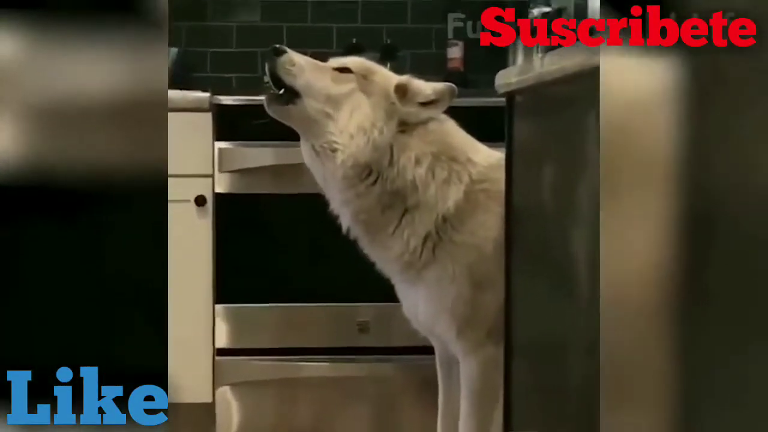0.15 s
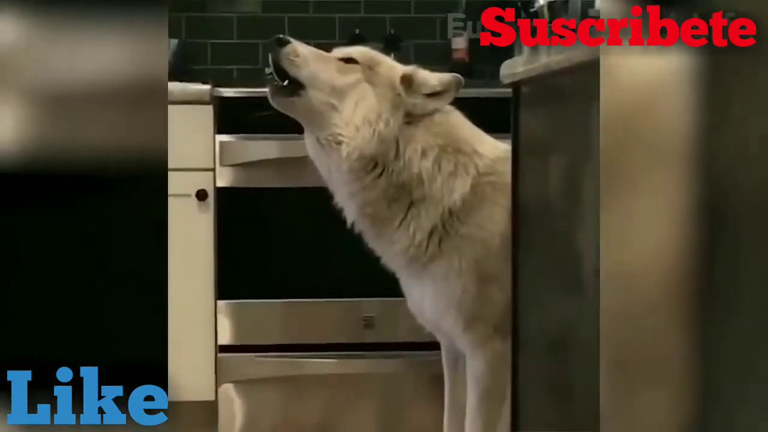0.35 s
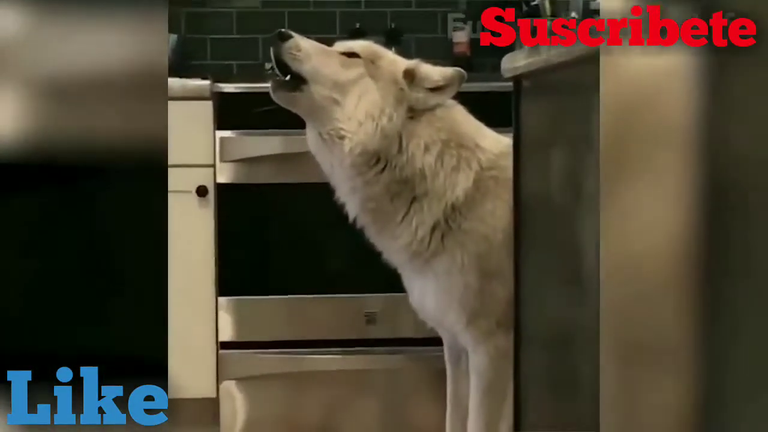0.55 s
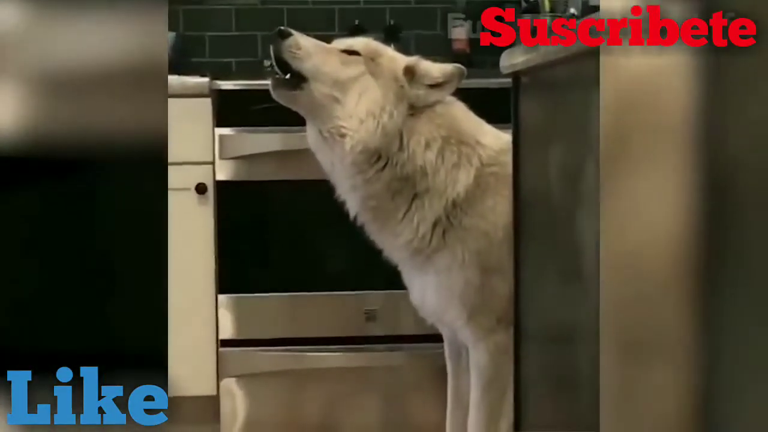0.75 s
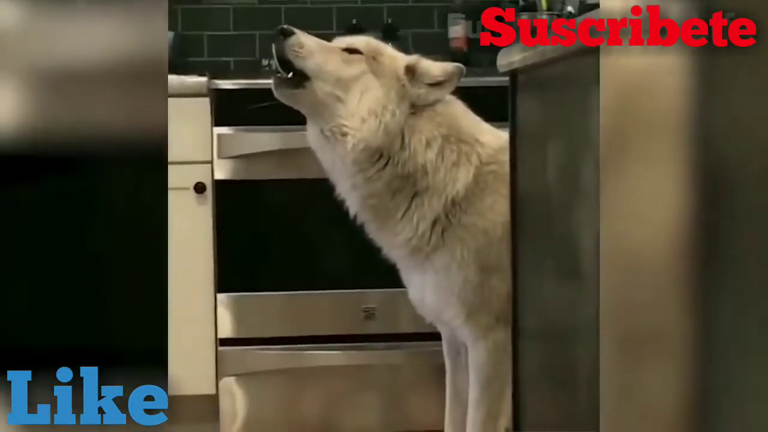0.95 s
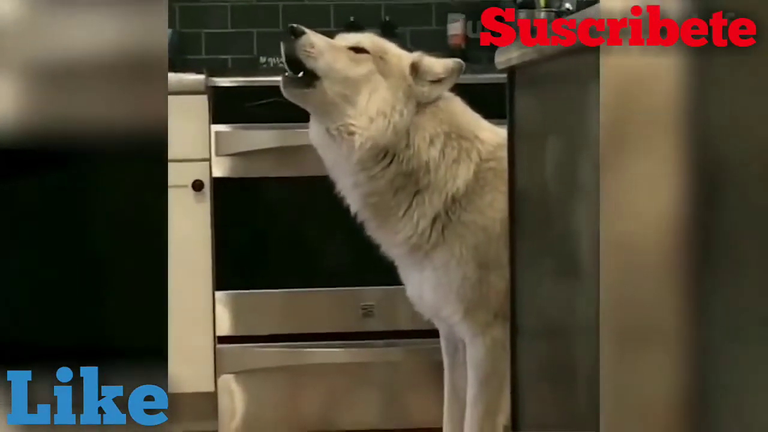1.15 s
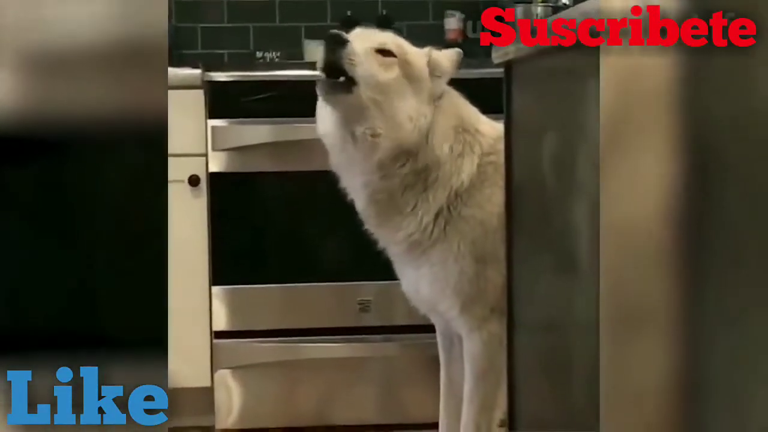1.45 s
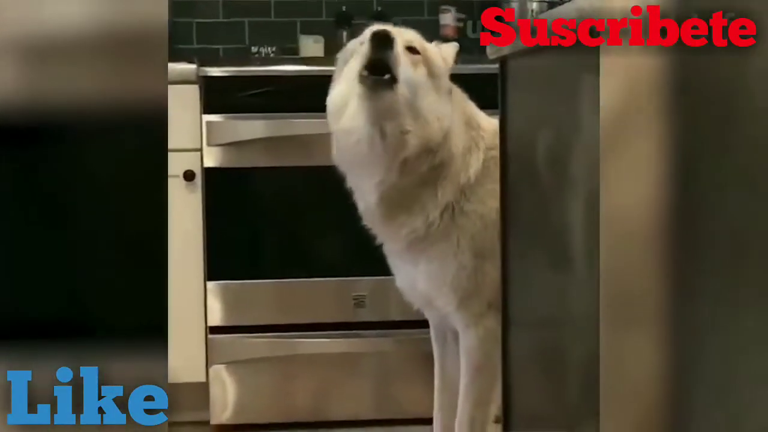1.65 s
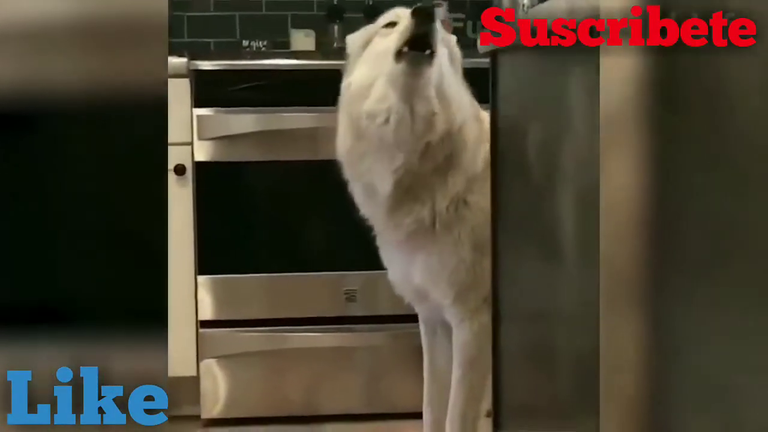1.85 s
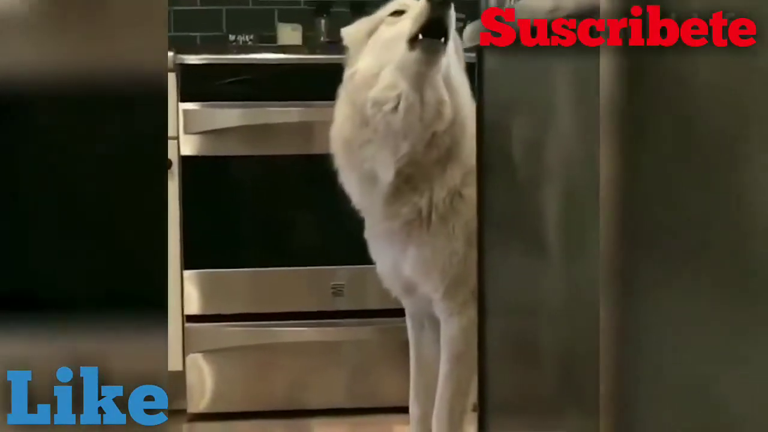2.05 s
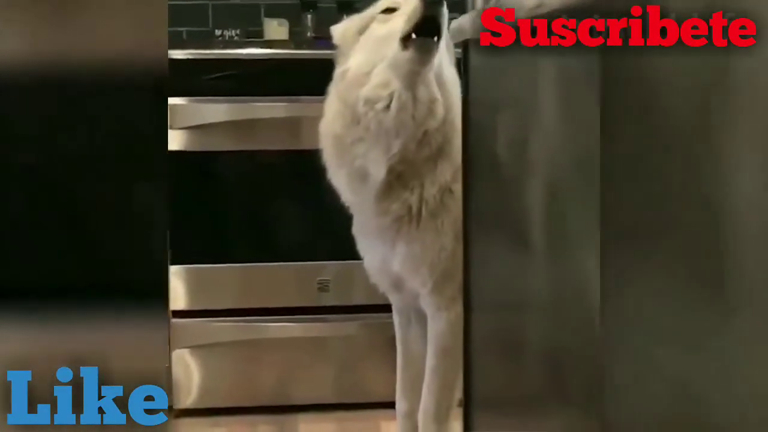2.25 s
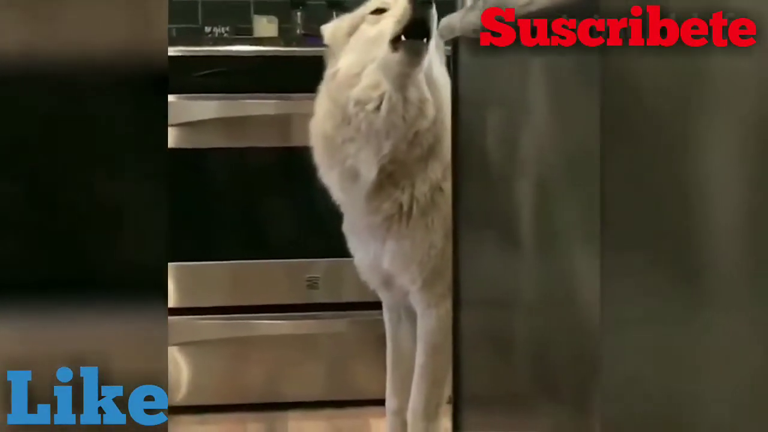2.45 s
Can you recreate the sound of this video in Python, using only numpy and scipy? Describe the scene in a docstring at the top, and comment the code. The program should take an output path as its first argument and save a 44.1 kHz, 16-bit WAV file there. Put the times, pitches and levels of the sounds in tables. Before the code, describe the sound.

Single unbroken wolf-like dog howl indoors, already sounding at the start and lasting throughout; it sags, wavers and climbs back, with light breath, short hard-room reverberation, quiet appliance hum and slightly dulled top end.

```python
"""Dog howling in a kitchen

Indoors, a tiled kitchen: a large dog holds one long, clean howl; the pitch sags and recovers, and late on
the third throat resonance rises briefly. Four strong low partials swell and dip; faint high ones are sines
shaped by narrow throat resonances, with filtered noise for breath and hiss. The walls add a dense tail and
one ringing mode. Behind lie quiet room noise and a wavering appliance hum; the recorder cuts the top."""
import sys
import numpy as np
from scipy import signal
from scipy.fft import rfft, irfft, next_fast_len
from scipy.io import wavfile
from scipy.ndimage import uniform_filter1d

SR = 44100
rng = np.random.default_rng(int(sys.argv[2]) if len(sys.argv) > 2 else 0)


def persist_wave(psi):
    """Save psi, clipped to +-1, as 16-bit WAV."""
    counts = np.round(np.clip(psi, -1, 1) * 32767).astype(np.int16)
    wavfile.write(sys.argv[1], SR, np.atleast_2d(counts).T)


N = 114660
TIME_S = np.arange(N) / SR
TOP_HZ = 11900  # upper limit of the recorder
UNSTEADY = 0.44  # wavering and grain grow by this share while the pitch is down
CLEARS_DB = -2  # change of flutter and low breath while the pitch is down


# The held howl: start_s, pitch_hz, then level_db (rms, before the room) of partials 1, 2, 3, 4
HOWL_COURSE = [(0.03, 332.9, -22, -29.5, -35.5, -36.5), (0.09, 334.5, -20.5, -31, -29.5, -35.5),
               (0.19, 333.9, -20, -32, -34, -34.5), (0.37, 335.2, -20.5, -40, -31.5, -35),
               (0.4, 336.3, -20, -44, -30, -35), (0.45, 337.5, -19.5, -33, -29, -32.5),
               (0.54, 338.8, -18, -29.5, -38.5, -34), (0.6, 338.5, -18, -28.5, -34, -31.5),
               (0.82, 339.4, -18, -31, -40, -34.5), (0.93, 341.7, -17.5, -35, -48, -43),
               (0.98, 340.8, -17.5, -33, -41, -43.5), (1.07, 341.5, -18, -34.5, -36, -40),
               (1.12, 340.2, -18, -35.5, -47, -40.5), (1.15, 340.6, -18, -35, -39, -40),
               (1.23, 339, -17, -32.5, -28.5, -35.5), (1.28, 339.2, -17, -33, -28.5, -40),
               (1.34, 336.2, -18, -30.5, -28.5, -32), (1.4, 335.2, -19, -34, -25, -32),
               (1.42, 334.2, -20, -41.5, -28, -34), (1.46, 330.8, -21.5, -32.5, -37, -31.5),
               (1.49, 330.7, -20, -28, -36.5, -41.5), (1.55, 325.6, -20.5, -32.5, -36, -36),
               (1.59, 324, -20.5, -32, -49.5, -36.5), (1.62, 325.1, -17.5, -31, -40.5, -37.5),
               (1.65, 318.5, -18.5, -31.5, -47, -45.5), (1.7, 318.5, -23, -33.5, -33.5, -38.5),
               (1.74, 321.5, -23.5, -34.5, -41.5, -43), (1.8, 322, -19, -42, -42, -36),
               (1.85, 321.4, -17, -37.5, -33.5, -33), (1.89, 319.5, -18, -41, -35.5, -32),
               (1.93, 323.8, -17.5, -47.5, -34.5, -31), (1.97, 323, -16, -43.5, -32.5, -29),
               (1.99, 324.6, -16, -44.5, -36.5, -29), (2.02, 331.4, -16.5, -31.5, -28, -28),
               (2.07, 334.7, -26.5, -30.5, -27, -28.5), (2.09, 334.5, -22, -28.5, -22.5, -28.5),
               (2.22, 337.5, -16.5, -25.5, -27, -30.5), (2.25, 339, -14.5, -23.5, -37.5, -35),
               (2.33, 338.3, -15, -24, -42, -34), (2.37, 340.1, -15.5, -23.5, -29.5, -42.5),
               (2.4, 340.2, -16, -23.5, -28.5, -53.5), (2.45, 340.2, -17, -25, -35.5, -45.5),
               (2.5, 340.4, -17.5, -25, -35, -50.5), (2.57, 340.8, -18, -24.5, -34.5, -48)]
SAG_BELOW_HZ, SAG_SPAN_HZ = 334, 5.1  # the sag begins below this pitch and is full one span lower


def howl_course():
    """Pitch, four partial levels, and how far the pitch has sagged (0 to 1)."""
    pitch, *levels = course(HOWL_COURSE)
    pitch = uniform_filter1d(pitch, SR // 20)
    sag = np.clip((SAG_BELOW_HZ - pitch) / SAG_SPAN_HZ, 0, 1)
    return pitch, levels, sag


# Strength of the throat and breath: start_s, level_db of the first six main resonances listed, breath_db
THROAT_COURSE = [(0.03, -58.5, -68, -62.5, -62, -82.5, -75, -57.5),
                 (0.07, -58, -73, -62.5, -64.5, -76, -73, -60.5),
                 (0.12, -59, -64.5, -59.5, -61.5, -80.5, -77, -61),
                 (0.19, -66, -69, -63, -63.5, -66, -83, -62),
                 (0.23, -101, -63.5, -63, -66.5, -66.5, -74.5, -60.5),
                 (0.3, -67, -70, -62, -65.5, -63.5, -79, -61),
                 (0.41, -59, -78.5, -71, -61.5, -64, -84, -59.5),
                 (0.46, -64, -64, -68, -64.5, -63, -79, -62),
                 (0.56, -63.5, -70, -72.5, -58.5, -69, -81.5, -57),
                 (0.61, -100, -70.5, -74.5, -59, -63, -79, -58),
                 (0.8, -107, -65, -76.5, -57, -76, -77, -64),
                 (0.84, -66, -61.5, -72, -55.5, -63.5, -83, -59.5),
                 (0.99, -65, -60.5, -73, -61.5, -69.5, -72.5, -61),
                 (1.12, -65.5, -65, -76.5, -64.5, -61.5, -76.5, -61.5),
                 (1.27, -74, -60, -66, -59.5, -56.5, -68, -58.5),
                 (1.39, -86, -78, -64.5, -62.5, -71, -75.5, -59),
                 (1.55, -61.5, -59, -75.5, -80.5, -74, -78.5, -63),
                 (1.59, -58.5, -71.5, -80, -80, -69, -74.5, -68.5),
                 (1.66, -63, -64, -78.5, -79.5, -62.5, -79, -63),
                 (1.75, -54.5, -84, -70.5, -88.5, -64.5, -73.5, -66),
                 (1.83, -56.5, -61, -65, -66, -75, -67, -56.5),
                 (1.9, -58.5, -54.5, -63.5, -63.5, -60.5, -69.5, -61.5),
                 (1.95, -55.5, -56, -59, -59, -71.5, -65.5, -72.5),
                 (2.0, -55.5, -53, -58, -59, -66, -76, -52.5),
                 (2.05, -82, -52, -55.5, -53.5, -66, -61, -63.5),
                 (2.14, -83, -54.5, -57.5, -46.5, -59, -63, -54.5),
                 (2.3, -52, -51.5, -55, -53, -55.5, -61, -57.5),
                 (2.46, -56, -54.5, -52, -54, -65.5, -71, -57),
                 (2.57, -55, -51.5, -54.5, -57, -67, -65, -59)]
WOBBLE, WOBBLE_PER_S = 0.00036, 75  # rms share of the pitch while it is up; bandwidth in Hz
STRAIN = 0.5  # the wobble grows by this share while the pitch is down
SHIMMER_DB, SHIMMER_HZ = -40.5, 65  # depth while the pitch is up; width of the skirt round each partial


def dog(pitch, levels, sag):
    """Harmonics on one wobbling pitch; flutter of the folds modulates them all, breath and hiss add to them."""
    *ring, breath_db = course(THROAT_COURSE)
    wobble = WOBBLE * (1 + STRAIN * sag) * narrow(0, WOBBLE_PER_S)
    phase = 2 * np.pi * np.cumsum(pitch * (1 + wobble)) / SR
    strengths, rise = throat_strengths(ring), third_rise()
    voice = low_partials(phase, levels, sag)
    voice = voice + treble_partials(pitch, phase, strengths, rise, sag)
    voice = voice + half_partials(pitch, phase, strengths, rise)
    flutter = 1 + undb(SHIMMER_DB + CLEARS_DB * sag) * narrow(0, SHIMMER_HZ)
    return np.sqrt(2) * voice * flutter + low_breath(breath_db, sag) + throat_hiss(breath_db)


# Moments when a partial's standing wave passes a node: start_s (centre), partial_number, width_s
STANDING_NODES = [(.40, 2, .02), (1.115, 3, 0.012), (1.425, 2, 0.011), (1.992, 3, 0.01), (2.071, 1, 0.012),
                  (2.33, 3, 0.017)]
WAVER_DB, WAVER_PER_S = 0.1414, 65  # rms per partial number while the pitch is up; bandwidth in Hz


def low_partials(phase, levels, sag):
    """Four strong sines waver alone, higher ones more; each cancels and flips sign at its nodes."""
    sizes = []
    for k, level_db in enumerate(levels, 1):
        waver_db = WAVER_DB * k * (1 + UNSTEADY * sag) * narrow(0, WAVER_PER_S)
        sizes.append(undb(level_db + waver_db))
    for centre_s, k, width_s in STANDING_NODES:
        sizes[int(k) - 1] *= np.tanh((TIME_S - centre_s) / width_s)
    return sum(size * np.sin(k * phase + rng.uniform(0, 2 * np.pi)) for k, size in enumerate(sizes, 1))


TOP_PARTIAL = 34
FADE_DB, FADE_PER_S = 1.5, 13  # rms of each partial's own fading; bandwidth in Hz
# quick flicker while the pitch is up: dB per partial number, levelling off; bandwidth in Hz
GRAIN_DB, GRAIN_PER_S = 0.14, 38
# share of a partial that turns to breath while the pitch is down; lowest such partial; width
BREATHY, BREATHY_FROM, BREATHY_HZ = 0.25, 13, 70


def treble_partials(pitch, phase, strengths, rise, sag):
    """Faint sines weighted by the throat; each fades and flickers alone, the upper ones blur in the sag."""
    high = 0
    for k in range(5, TOP_PARTIAL + 1):
        tone = throat(k * pitch, strengths, rise) * np.sin(k * phase + rng.uniform(0, 2 * np.pi))
        if k >= BREATHY_FROM:
            tone = tone * (1 + BREATHY * sag * (narrow(0, BREATHY_HZ) - 1))
        grain_db = 2.7 * np.tanh(GRAIN_DB * k * (1 + UNSTEADY * sag) / 3.0)
        high = high + tone * undb(FADE_DB * narrow(0, FADE_PER_S) + grain_db * narrow(0, GRAIN_PER_S))
    return high


BREAK_S, BREAK_WIDTH_S, BREAK_DB = 1.995, 0.023, -1  # centre, width, level against the throat


def half_partials(pitch, phase, strengths, rise):
    """The voice roughens briefly on its way back up: partials 10.5 to 12.5 sound in the throat."""
    halves = sum(throat(k * pitch, strengths, rise) * np.sin(k * phase) for k in (10.5, 11.5, 12.5))
    return undb(BREAK_DB) * rough_patch() * halves


def rough_patch():
    """Bell in time round the break in the voice."""
    return np.exp(-((TIME_S - BREAK_S) / BREAK_WIDTH_S) ** 2)


# Two further throat resonances, their own course: start_s, level_db of the first, level_db of the second
SIDE_COURSE = [(0.03, -82.5, -77), (1.15, -72, -76.5), (2.03, -77.5, -88.5), (2.25, -54.5, -71),
               (2.57, -72.5, -77)]


def throat_strengths(ring):
    """Gain of every resonance in time; the last three main ones follow the sixth."""
    main = [undb(row[2] + ring[min(j, 5)]) for j, row in enumerate(RESONANCES)]
    return main + list(undb(course(SIDE_COURSE)))


THIRD_RISE_HZ, RISE_START_S, RISE_END_S = 220, 2.1, 2.21


def third_rise():
    """Smoothed 0-to-1 gate for the brief rise of the third throat resonance."""
    return uniform_filter1d(1. * (TIME_S > RISE_START_S) * (TIME_S < RISE_END_S), SR // 20)


# Main throat resonances: centre_hz, width_hz, level_db (against the throat course)
RESONANCES = [(1602, 330, 2.5), (1970, 260, 2), (2450, 560, -3), (3769, 350, 2), (4735, 570, -1),
              (5709, 160, 4.5), (3200, 350, -8), (9150, 520, -12.5), (10900, 550, -19)]
# The two further resonances: centre_hz, width_hz
SIDE_RESONANCES = [(4400, 240), (6550, 750)]
# Side pockets of the throat that swallow bands: centre_hz, width_hz
SIDE_POCKETS = [(4150, 230), (5300, 220), (6230, 160), (7300, 400)]


def throat(hz, strengths, rise):
    """Gain at a frequency: steep resonances side by side, times a notch for each pocket."""
    gain = 0
    for j, (row, strength) in enumerate(zip(RESONANCES + SIDE_RESONANCES, strengths)):
        centre_hz = row[0] + (j == 2) * THIRD_RISE_HZ * rise
        gain = gain + strength / (1 + (2 * (hz - centre_hz) / row[1]) ** 2) ** 2
    for centre_hz, width_hz in SIDE_POCKETS:
        gain = gain * (1 - 1.2 / (1 + (2 * (hz - centre_hz) / width_hz) ** 2))  # negative near the centre
    return gain


# Colour of the low breath: frequency_hz, level_db
BREATH_COLOUR = [(150, -34), (300, -4.5), (430, -2), (540, -9.5), (750, -12), (1100, -11.5), (1450, -16),
                 (1700, -45)]
BREATH_DB = 5  # against the breath course, while the pitch is up


def low_breath(breath_db, sag):
    """Low coloured noise follows the breath course and thins out in the sag."""
    level_db = uniform_filter1d(breath_db, SR // 20) + BREATH_DB + CLEARS_DB * sag
    return undb(level_db) * coloured(BREATH_COLOUR)


# Colour of the hiss through the throat: frequency_hz, level_db
HISS_COLOUR = [(1400, -27.5), (1800, -16.5), (2500, -2.5), (3150, -21.5), (3750, -1.5), (4150, -27),
               (4700, -4.5), (5300, -24.5), (5800, -1.5), (6230, -21), (6650, -8.5), (7250, -24.5),
               (9000, -15.5), (10200, -26.5), (11000, -22), (11800, -24)]
HISS_DB = -9  # against the breath course


def throat_hiss(breath_db):
    """Steadier noise through the throat follows the breath course slowly, its bands flickering."""
    return undb(uniform_filter1d(breath_db, SR // 2) + HISS_DB) * patchy(coloured(HISS_COLOUR))


HISS_FLICKER_DB, HISS_FLICKER_PER_S = 3.5, 6.1  # rms of each band's flicker; bandwidth in Hz


def patchy(x, count=20):
    """Cut a noise into equal bands up to the top limit, each swelling and fading alone."""
    spectrum = rfft(x)
    band = np.arange(len(spectrum)) * SR * count // (N * TOP_HZ)
    total = 0
    for j in range(count):
        flicker = undb(HISS_FLICKER_DB * narrow(0, HISS_FLICKER_PER_S))
        total = total + irfft(spectrum * (band == j), N) * flicker
    return total


UNDER_HZ, UNDER_WIDTH_HZ = 152, 5.5  # centre; rms wander
UNDER_DB, UNDER_BREAK_DB = -61.5, 5  # peak level in the full sag; rise at the break


def undertone(sag):
    """A low wandering sine sounds while the pitch is down, stronger round the break."""
    phase = 2 * np.pi * np.cumsum(UNDER_HZ + UNDER_WIDTH_HZ * narrow(0, 15.0)) / SR
    return undb(UNDER_DB + UNDER_BREAK_DB * rough_patch()) * sag * np.sin(phase)


KITCHEN_T60_S, KITCHEN_DB = 0.49, -25
ROOM_MODE_HZ, ROOM_MODE_T60_S, ROOM_MODE_DB = 988.6, 0.45, 7  # the third partial rings it in passing


def kitchen(x):
    """Hard walls: a dense tail that dies away, and one standing wave, added to the direct sound."""
    t = np.arange(SR // 2) / SR
    tail = rng.standard_normal(len(t)) * np.exp(-np.log(1000) * t / KITCHEN_T60_S)
    tail = undb(KITCHEN_DB) * tail / np.sqrt(np.sum(tail ** 2))
    decay = np.exp(-np.log(1000) * t / ROOM_MODE_T60_S)
    mode = undb(ROOM_MODE_DB) * 2 * decay / decay.sum() * np.cos(2 * np.pi * ROOM_MODE_HZ * t)
    return x + signal.fftconvolve(x, tail + mode)[:N]


# Colour of the quiet room: frequency_hz, level_db
ROOM_COLOUR = [(45, -7.5), (75, -11), (120, -6), (200, -6.5), (450, -30.5), (2000, -40), (4000, -52),
               (11000, -57.5)]
ROOM_DB = -66
HUM_HZ, HUM_WIDTH_HZ, HUM_DB = 72.8, 2.7, -65.5


def quiet_room():
    """Coloured room noise, and an appliance hum made of noise so narrow that it sounds as a wavering tone."""
    return undb(ROOM_DB) * coloured(ROOM_COLOUR) + undb(HUM_DB) * narrow(HUM_HZ, HUM_WIDTH_HZ)


def undb(db):
    """Decibels to amplitude."""
    return 10 ** (np.asarray(db) / 20)


def unit(x):
    """Scale to rms 1."""
    return x / np.sqrt(np.mean(x ** 2))


def course(table):
    """Columns of a table as smooth curves in time."""
    rows = np.array(table, float).T
    return [uniform_filter1d(np.interp(TIME_S, rows[0], c), SR // 100) for c in rows[1:]]


def coloured(points):
    """Noise of rms 1 with the spectrum of (Hz, dB) points, joined on a log frequency axis."""
    hz, db = np.array(points, float).T
    f = np.maximum(np.arange(N // 2 + 1) * SR / N, 1)
    gain = undb(np.interp(np.log(f), np.log(hz), db))
    return unit(irfft(rfft(rng.standard_normal(N)) * gain, N))


def narrow(hz, width_hz, size=next_fast_len(N)):
    """Noise of rms 1 in a bell round hz: a wavering tone, or a random wander for hz = 0."""
    f = np.arange(size // 2 + 1) * SR / size
    bell = np.exp(-((f - hz) / width_hz) ** 2)
    return unit(irfft(rfft(rng.standard_normal(size)) * bell, size)[:N])


def scene():
    """The dog in the kitchen, with the undertone and quiet room added outside the reverberation."""
    pitch, levels, sag = howl_course()
    howl = kitchen(dog(pitch, levels, sag))
    return (howl + undertone(sag) + quiet_room())[None]


def record(dry):
    """The recorder cuts the top with a steep low-pass."""
    return signal.sosfilt(signal.ellip(8, .2, 70, TOP_HZ, fs=SR, output="sos"), dry)


dry = scene()
out = record(dry)
persist_wave(out)
```